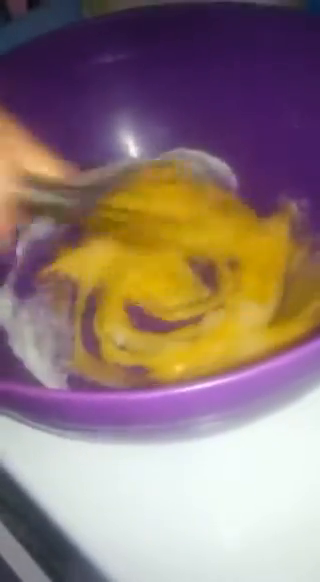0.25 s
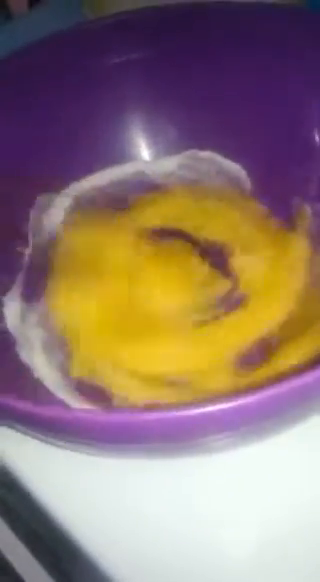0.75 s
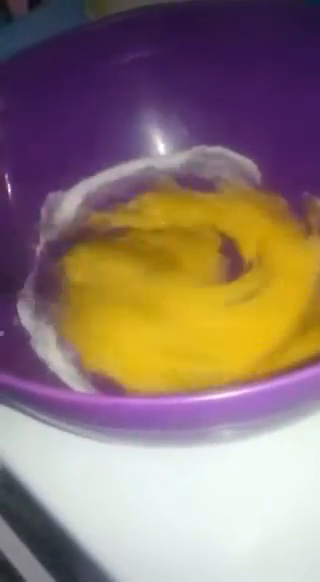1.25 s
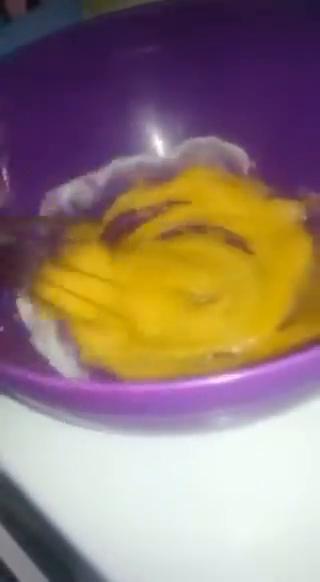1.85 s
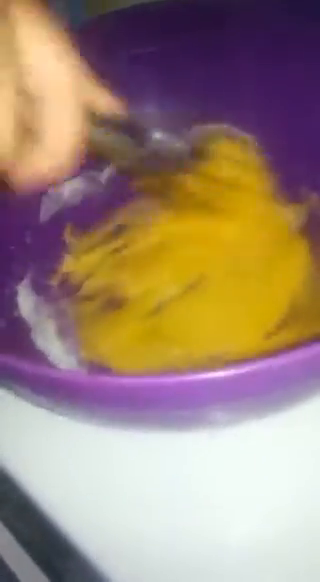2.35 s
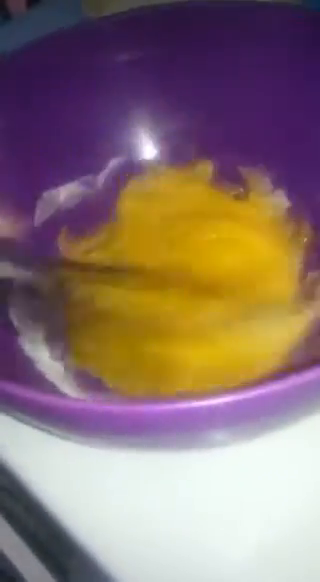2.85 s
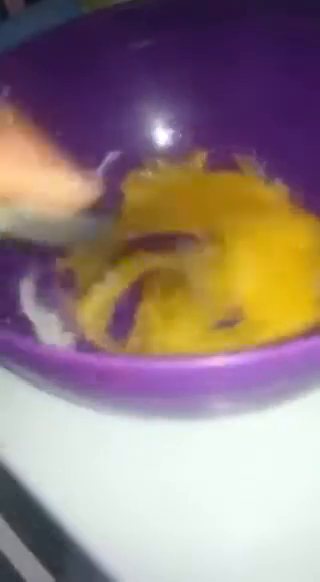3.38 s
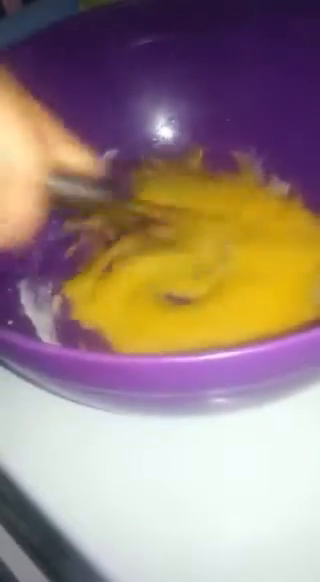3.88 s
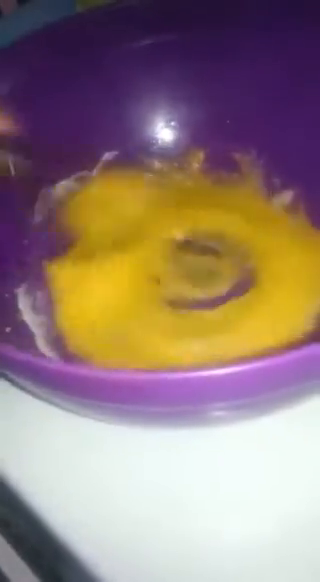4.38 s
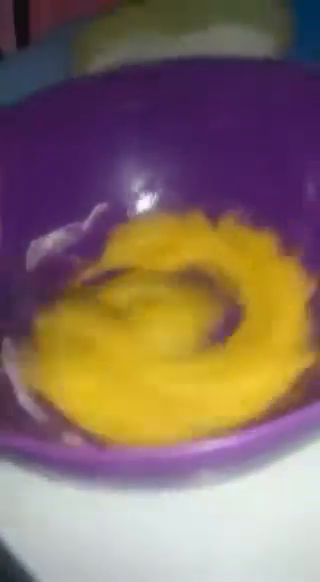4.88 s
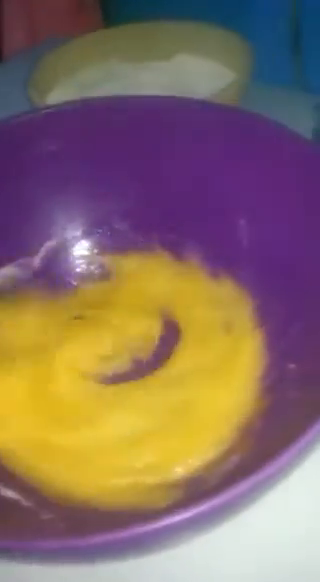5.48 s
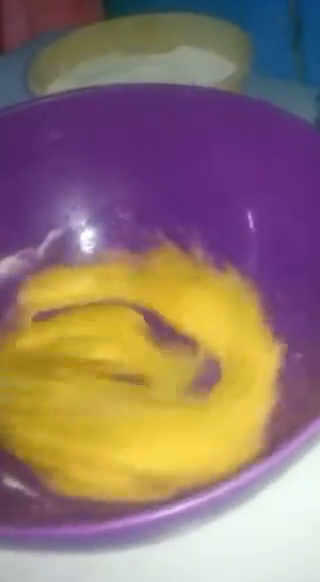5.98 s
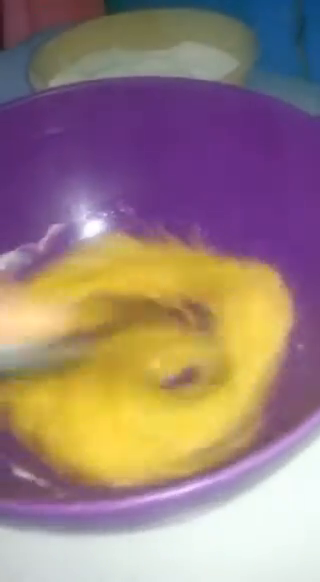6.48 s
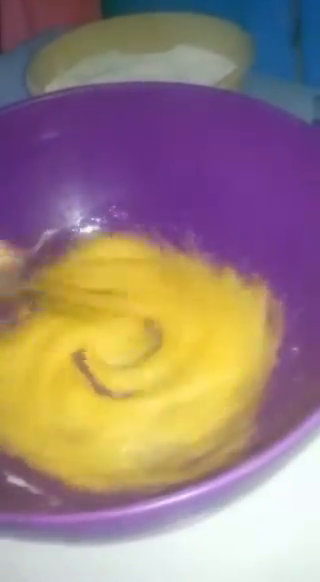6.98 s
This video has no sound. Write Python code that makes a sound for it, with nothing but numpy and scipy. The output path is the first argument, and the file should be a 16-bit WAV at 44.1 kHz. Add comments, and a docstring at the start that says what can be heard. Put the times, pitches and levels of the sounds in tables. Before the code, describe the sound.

Continuous brisk hand whisking in a plastic bowl, from first moment to last. Wires skip and knock around the wall with dry, changing pitches, while sugar crystals crunch and hiss beneath. Scrapes are denser in the first half; later sharp knocks crowd together over steadier rubbing. A few dull bowl bumps occur. Close two-microphone phone pickup, thin low end, short kitchen echo and very quiet background.

```python
"""Whisking yolks and sugar

A wire whisk beats yolks and sugar in a thin plastic bowl on a worktop, close to a phone with two microphones.
Wires knock and skip on the wall and grind sugar crystals along it: bursts and clicks of chance ring the
bowl, as decaying sines and short noise, at one spot after another. The finest crystals hiss straight into
the air, the bowl thuds on the worktop, and the kitchen answers with sparse echoes over a faint room tone."""
import sys
import numpy as np
from scipy import signal
from scipy.io import wavfile
from scipy.ndimage import uniform_filter1d

SR = 44100
rng = np.random.default_rng(int(sys.argv[2]) if len(sys.argv) > 2 else 0)


def master_out(mix):
    """Clip the mix to full scale and print it as 16-bit PCM to the path in sys.argv[1]."""
    frames = np.transpose(np.atleast_2d(mix))
    ceiling = np.clip(frames, -1, 1)
    pcm = np.round(ceiling * 32767).astype(np.int16)
    wavfile.write(sys.argv[1], SR, pcm)


N = 319284  # samples in the scene

# knocks of the wires on the wall: (t/s, level/dB, f/Hz favoured at the spot)
KNOCKS = [(0.1619, -10.5, 1700), (0.176, -17, 2700), (0.207, -13, 2070), (0.2208, -8.5, 2070),
          (0.247, -10, 1970), (0.344, -11.5, 3270), (0.4245, -10.5, 3180), (0.4486, -12, 2740),
          (0.484, -11, 2900), (0.5302, -10, 3770), (0.542, -9.5, 1920), (0.573, -13, 2180),
          (0.6625, -4, 2980), (0.8448, -12, 1820), (0.988, -11, 3140), (1.013, -12, 1550),
          (1.043, -13, 1970), (1.1327, -9, 1950), (1.221, -8, 3050), (1.3054, -9.5, 3080),
          (1.373, -6.5, 1920), (1.4558, -16, 3140), (1.4777, -12.5, 2300), (1.587, -28, 1020),
          (1.6543, -12.5, 1060), (1.69, -5, 1800), (1.752, -13.5, 2000), (1.771, -18, 2000),
          (1.804, -14, 1060), (1.8222, -12, 1060), (1.983, -14, 1020), (2.0691, -9, 1700),
          (2.098, -14, 2100), (2.169, -13, 2070), (2.1817, -6, 2860), (2.324, -10, 1390),
          (2.3662, -9, 1630), (2.4076, -18, 1030), (2.6463, -4, 1920), (2.7047, -13, 2380),
          (2.728, -13.5, 2380), (2.789, -15, 2400), (2.82, -5, 2110), (2.8459, -7.5, 2010),
          (2.906, -10.5, 2270), (2.938, -14.5, 1080), (3.03, -16, 2690), (3.047, -12.5, 2540),
          (3.1826, -11, 2850), (3.2025, -9.5, 2400), (3.2329, -7, 1830), (3.3114, -9, 2480),
          (3.3304, -9, 1040), (3.449, -13, 4300), (3.5357, -8, 1970), (3.5785, -5.5, 1760),
          (3.6098, -11.5, 2650), (3.642, -15.5, 2350), (3.7348, -10, 2270), (3.8715, -7.5, 2200),
          (3.983, -14, 2880), (4.2708, -10.5, 1410), (4.353, -15, 2300), (4.4378, -10.5, 2290),
          (4.5183, -9, 2500), (4.546, -10, 2880), (4.5654, -10, 2940), (4.5976, -10, 3000),
          (4.7081, -6.5, 2780), (4.7267, -8.5, 2080), (4.7934, -8.5, 1630), (4.818, -9.5, 2270),
          (4.8416, -9, 1950), (4.8603, -18, 1570), (4.877, -12, 3120), (4.8972, -15, 1580),
          (4.921, -13, 1570), (4.9354, -29, 1600), (4.986, -9, 1690), (5.036, -7.5, 2030),
          (5.0682, -8, 1610), (5.1091, -7, 2260), (5.204, -21, 2120), (5.228, -30, 2140),
          (5.2828, -14, 1970), (5.303, -19, 2760), (5.401, -13.5, 3400), (5.432, -13, 1420),
          (5.4642, -8.5, 2100), (5.5578, -7, 2000), (5.5971, -14, 2130), (5.613, -10, 2060),
          (5.7212, -6.5, 1420), (5.764, -16.5, 1060), (5.844, -10, 1690), (5.8809, -9, 1970),
          (5.916, -14.5, 1120), (5.951, -14, 2970), (5.991, -10.5, 3000), (6.014, -7, 2880),
          (6.1762, -10.5, 2220), (6.275, -18, 3260), (6.3037, -12, 3030), (6.342, -14, 2860),
          (6.5662, -7, 3760), (6.582, -13.5, 1490), (6.6897, -11, 1910), (6.825, -9, 2800),
          (6.8722, -11, 2780), (6.9015, -16, 2850), (6.9769, -6, 2000), (7.017, -14, 1050),
          (7.0876, -9.5, 3170), (7.1262, -10, 3430), (7.1642, -11, 1710)]
# bowl modes before detuning and yolk damping: (f/Hz, relative level/dB, t60/s, left-right level/dB)
BOWL = [(285, -9.5, 0.054, -0.5), (371.4, -10, 0.055, -3), (549.4, -3.5, 0.043, 1), (628, -7, 0.018, -11),
        (1043, 1.5, 0.035, -4.5), (1556, 12, 0.045, 0.5), (2073, 9, 0.025, 8.5), (2440, -3.5, 0.017, 45),
        (3058, 5.5, 0.012, 32.5), (4504, 9, 0.0038, 40)]
# likeness of the two microphones: (f/Hz, share in common 0-1)
SAME = [(60, 0.38), (180, 0.8), (550, 0.59), (1650, 0.12), (4970, 0.02)]
SPOT_HZ = np.geomspace(1000, 6200, 36)  # pitch that each spot of the wall favours
RING = 4096  # samples that a contact rings


def gain_of(db):
    """Amplitude factor for a level in dB."""
    return 10 ** (np.asarray(db) / 20)


def evened(x):
    """The same signal at rms 1."""
    return x / np.sqrt(np.mean(x ** 2) + 1e-20)


def read(points, hz):
    """Read a (Hz, value) table at any pitch, along a logarithmic scale."""
    f, value = np.transpose(points)
    return np.interp(np.log(hz + 1), np.log(f + 1), value)


def near(hz, spot_hz, octaves):
    """Bell-shaped weight around a pitch."""
    return np.exp(-.5 * (np.log2((hz + 1) / spot_hz) / octaves) ** 2)


def band(x, lo_hz, hi_hz):
    """Keep what lies between two pitches."""
    sos = signal.butter(2, [lo_hz, min(hi_hz, .45 * SR)], "band", fs=SR, output="sos")
    return signal.sosfilt(sos, x)


def drift(seconds, count):
    """Slow chance in rows, rms 1 over all of them, computed at every 32nd sample."""
    size = max(round(seconds * SR / 32), 1)
    slow = rng.standard_normal((count, N // 32 + 1))
    slow = uniform_filter1d(uniform_filter1d(slow, size), size)
    return np.repeat(evened(slow), 32, axis=1)[:, :N]


def grains(per_s, spread_db, shape):
    """Sparse clicks, a few of them large."""
    happens = rng.random(shape) < per_s / SR
    return happens * gain_of(spread_db * np.minimum(rng.exponential(1, shape), 3))


def pair_noise(spectrum, length):
    """Noise for two microphones from short-time spectra, alike in the bass and nearly unrelated above."""
    # lean of noise towards one microphone: (f/Hz, left-right level/dB)
    noise_lean = [(130, 0.5), (640, -1.5), (1410, 2.5), (3100, 8.0), (6820, 1.0)]
    hz = np.fft.rfftfreq(512, 1 / SR)
    a, b, c, d = rng.standard_normal((length // 128 + 5, 257, 4)).T
    same = np.clip(read(SAME, hz), -1, 1)[:, None]
    left = a + 1j * b
    right = same * left + np.sqrt(1 - same ** 2) * (c + 1j * d)
    lean = read(noise_lean, hz) / 2
    level_db = read(spectrum, hz) + np.array([lean, -lean])
    spectra = np.array([left, right]) * gain_of(level_db)[:, :, None]
    return signal.istft(spectra, nperseg=512, noverlap=384)[1][:, 256:length + 256]


def modes_ring(rows, favour_db, out_of_step):
    """Decaying sines for both microphones; short waves reach the second one out of step."""
    t = np.arange(RING) / SR
    hz, db, t60, lean = np.transpose(rows)[:, :, None]
    detune, turn = rng.standard_normal((2, len(rows), 1))
    turn = turn * out_of_step * np.sqrt(1 - read(SAME, hz))
    fade = gain_of(db + favour_db - 60 * t / t60) * (1 - np.exp(-t / 0.00047))
    detuned_hz = hz * (1 + 0.039 * np.minimum(hz / 2000, 1) * detune)
    angle = 2 * np.pi * detuned_hz * t
    left = gain_of(lean / 2) * fade * np.sin(angle)
    right = gain_of(-lean / 2) * fade * np.sin(angle + turn)
    return np.array([left.sum(0), right.sum(0)])


def spot_ring(spot_hz, favour_db=16.5, uneven_db=-2.5, wall_db=4.0, wall_t60=0.032):
    """What one spot of the wall sends out: modes near its own pitch stand out, over many small quick ones."""
    # crowded small modes of the wall: (f/Hz, relative level/dB per Hz)
    wall_spectrum = [(276, -93), (744, -9), (1050, -9.5), (1270, -15.5), (2010, -3.5), (2990, -5),
                     (14300, -28.5)]
    t = np.arange(RING) / SR
    hz = np.transpose(BOWL)[0][:, None]
    favour = favour_db * near(hz, spot_hz, 0.08) + uneven_db * rng.standard_normal(hz.shape)
    modes = modes_ring(BOWL, favour, 1.18)
    wall = pair_noise(wall_spectrum, RING) * gain_of(-60 * t / wall_t60)
    wall *= 1 - np.exp(-t / 0.000079)
    wall = evened(wall) + 0.83 * evened(band(wall, 0.892 * spot_hz, 1.143 * spot_hz))
    return evened(evened(modes) + gain_of(wall_db) * evened(wall)) / np.sqrt(RING)


def room_tone():
    """Faint steady noise of the room, shaped by its spectrum."""
    # (f/Hz, relative level/dB per Hz)
    tone_spectrum = [(150, -20), (788, 7), (1050, -36), (14300, -11)]
    return gain_of(-45.5) * evened(pair_noise(tone_spectrum, N))


def stroke():
    """Pressure in dB and rubbing pitch in Hz: scrapes dig in, hold and ease off over a light drag,
    while the wires rub their way from one knocked spot to the next."""
    # light drag of the wires between scrapes: (t/s, pressure level/dB)
    drag = [(0.0, -27), (1.2, -27.5), (1.6, -34), (2.0, -30.5), (2.45, -37), (2.56, -50), (3.048, -35),
            (3.5, -28.5), (4.0, -30), (4.3, -32.5), (4.9, -26.5), (5.3, -28), (6.5, -27), (7.24, -30.5)]
    # scrapes of the wires along the wall: (start t/s, hold t/s, pressure level/dB)
    scrapes = [(0.0, 0.0033, -20), (0.07, 0.14, -31.5), (0.365, 0.024, -28.5), (0.458, 0.14, -26.5),
               (0.66, 0.058, -26.5), (0.914, 0.042, -25.5), (1.162, 0.013, -21.5), (1.388, 0.041, -26),
               (1.512, 0.041, -27.5), (1.797, 0.053, -29.5), (2.132, 0.09, -28.5), (2.277, 0.15, -25.5),
               (2.567, 0.021, -32.5), (2.675, 0.087, -27.5), (2.845, 0.057, -25), (3.142, 0.034, -31.5),
               (3.214, 0.046, -23), (3.457, 0.03, -27), (4.789, 0.018, -24), (6.185, 0.037, -28.5),
               (6.533, 0.08, -32), (6.674, 0.069, -26.5), (7.007, 0.033, -26.5)]
    bite_db_per_s, ease_db_per_s = 621, 381  # how fast a scrape digs in and lets go
    t = np.arange(0, N, 64) / SR
    start, hold, db = np.transpose(scrapes)[:, :, None]
    bite = bite_db_per_s * np.maximum(start - t, 0)
    ease = ease_db_per_s * np.maximum(t - start - hold, 0)
    scrape_power = gain_of(db - bite - ease) ** 2
    power = gain_of(np.interp(t, *np.transpose(drag))) ** 2 + scrape_power.sum(0)
    rub_hz = np.interp(t, *np.transpose(KNOCKS)[::2])
    return [np.interp(np.arange(N) / SR, t, c) for c in (10 * np.log10(power), rub_hz)]


def catching(wires_per_s=50.0, catch_s=0.0057, catch_db=-0.5):
    """One wire after another catches on the wall and slips; just before a knock they lift off the wall."""
    lift_db, lift_s = -2, .01
    lift = round(lift_s * SR)
    landings = np.zeros(N)
    landings[(np.transpose(KNOCKS)[0] * SR).astype(int)] = 1
    lifted = np.convolve(landings, np.linspace(0, 1, lift) ** .5)[lift:][:N]
    lifted = np.pad(lifted, (0, N - len(lifted)))
    pace = wires_per_s * gain_of(3.0 * drift(.03, count=1)[0])
    turns = np.floor(np.cumsum(pace) / SR)
    catches = np.diff(turns, prepend=0) * rng.random(N)
    catches = np.convolve(catches, signal.windows.hann(round(catch_s * SR)))[:N]
    return (1 + gain_of(catch_db) * catches) * gain_of(lift_db * lifted)


def grind(rings, stutter, damping_db_per_s=1198.0):
    """Crystals crack under the wires, damped by the yolk; the contact wanders from spot to spot."""
    pressure_db, rub_hz = stroke()
    where = 0.79 + near(SPOT_HZ[:, None], rub_hz, 0.44)
    where *= gain_of(5.0 * drift(.008, count=len(rings)))
    where /= np.sqrt((where ** 2).sum(0))
    out = np.zeros((2, N))
    damped = gain_of(-damping_db_per_s * np.arange(RING) / SR)
    for share, ring in zip(where, rings):
        force = share * grains(45, 4.14, N)
        out += signal.oaconvolve(force[None], ring * damped, axes=1)[:, :N]
    return evened(out) * gain_of(pressure_db + 2.0) * stutter


def rocking(stutter):
    """The drag of the wires shakes the low modes of the whole bowl, now one, now another."""
    pressure_db = stroke()[0]
    low = [row for row in BOWL if row[0] < 1200]
    swings = gain_of(10.3 * np.tanh(drift(0.033, count=len(low))))
    out = np.zeros((2, N))
    for row, swing in zip(low, swings):
        force = swing * grains(400, 3.45, N) * stutter
        out += signal.oaconvolve(force[None], modes_ring([row], 0, 0.95), axes=1)[:, :N]
    return evened(out) * gain_of(-18.5 + 0.64 * pressure_db)


def hiss(stutter):
    """The finest crystals crackle straight into the air, without the bowl."""
    ticks = grains(1500, 0.62, (2, N)) * rng.standard_normal((2, N))
    ticks = evened(band(ticks, 3250.0, 10850.0))
    return ticks * gain_of(stroke()[0] - 10.0 + 0.5 * drift(0.006, count=1)) * stutter


def knocks(landing_s=0.0039, damping_db_per_s=1500.0, snap_db=5.5):
    """Each knock is a rattle of wires landing within a few ms on a spot of its own, damped by the yolk;
    low ones last longer, loud ones snap harder in the treble."""
    rise_s = .0014  # the wires sink through the yolk before they bite
    out = np.zeros((2, N + 2 * RING))
    t = np.arange(RING // 4) / SR
    shape = (len(KNOCKS), len(t))
    rattle = rng.standard_normal(shape) * (rng.random(shape) < .08)
    damped = gain_of(-damping_db_per_s * np.arange(RING) / SR)
    for (s, db, hz), wires in zip(KNOCKS, rattle):
        at = round((s - rise_s) * SR)
        spread_s = landing_s * (2000 / hz) ** 0.86
        force = wires * (1 - np.exp(-t / rise_s)) / (1 + (t / spread_s) ** 4)
        body = signal.fftconvolve(force[None], spot_ring(hz) * damped, axes=1)[:, :RING]
        snap = band(force * rng.standard_normal((2, len(t))), 4000., 18000.0)
        out[:, at:][:, :len(t)] += gain_of(2.6 * db + snap_db) * snap / abs(snap).max()
        out[:, at:][:, :RING] += gain_of(db) * body / abs(body.mean(0)).max()
    return out[:, :N]


def thuds():
    """The bowl bumps the worktop: a soft push of about 1 ms into the low modes, with a puff of air below."""
    # (t/s, level/dB, f/Hz of the mode rung most)
    bumps = [(0.588, -16.5, 297), (1.55, -9.5, 577), (2.079, -12, 276), (2.323, -17.5, 280),
             (3.25, -19.5, 240), (2.494, -27.5, 200), (7.162, -13.5, 540)]
    out = np.zeros((2, N + 2 * RING))
    t = np.arange(RING) / SR
    mode_hz = np.transpose(BOWL)[0][:, None]
    for s, db, hz in bumps:
        ring = modes_ring(BOWL, 20. * near(mode_hz, hz, 0.2), 1.0)
        pushed = signal.lfilter(signal.windows.hann(50), 1, ring)
        puff = band(rng.standard_normal(RING), 67.0, 770.0) * gain_of(-60 * t / 0.17)
        thud = evened(pushed) + (300 / hz) ** 2 * evened(puff)
        soft = thud * (1 - np.exp(-t / 0.0067)) / abs(thud).max()
        out[:, round(s * SR):][:, :RING] += gain_of(db) * soft
    return out[:, :N]


def kitchen(x):
    """Sparse reflections of random sign from tiles and cupboards."""
    length = SR // 3
    taps, t = np.zeros((2, length)), np.arange(length) / SR
    at = np.arange(200, length - 20, 20) + rng.integers(0, 20, (2, (length - 201) // 20))
    np.put_along_axis(taps, at, rng.choice([-1., 1.], at.shape), 1)
    tail = taps * gain_of(-60 * t / 0.089)  # t60 in s
    return signal.fftconvolve(x, tail / np.linalg.norm(tail[0]), axes=1)[:, :N]


def rumble(loudness, deep_db=-71.0):
    """Faint lumps of deep bass that come with the louder moments."""
    lumps = uniform_filter1d(loudness, 900) * gain_of(8.5 * drift(0.077, count=1))
    return gain_of(deep_db) * evened(band(rng.standard_normal(N), 30., 87.0) * lumps)


def scene():
    """The whisk in the bowl, the treble echo of the kitchen and the room tone."""
    rings = [spot_ring(hz) for hz in SPOT_HZ]
    stutter = catching()
    bowl = grind(rings, stutter) + rocking(stutter) + hiss(stutter) + knocks() + thuds()
    echo = kitchen(band(bowl, 1800.0, 20000.0))
    return bowl + gain_of(-5.5) * echo + room_tone()


def record(dry):
    """The small microphones lose the bass of airborne sound; a ceiling holds the highest peaks;
    then the top treble is cut."""
    bass_cut = signal.butter(4, 165., "high", fs=SR, output="sos")
    thin = signal.sosfilt(bass_cut, dry) + rumble((dry ** 2).mean(0))
    held = np.clip(thin, -.9, .9)
    held = signal.oaconvolve(held, signal.firwin(255, 14500., fs=SR)[None], "same")
    band_limit = signal.firwin(511, 15676, window=("kaiser", 9), fs=SR)
    return signal.oaconvolve(held, band_limit[None], "same")


dry = scene()
out = record(dry)
master_out(out)
```